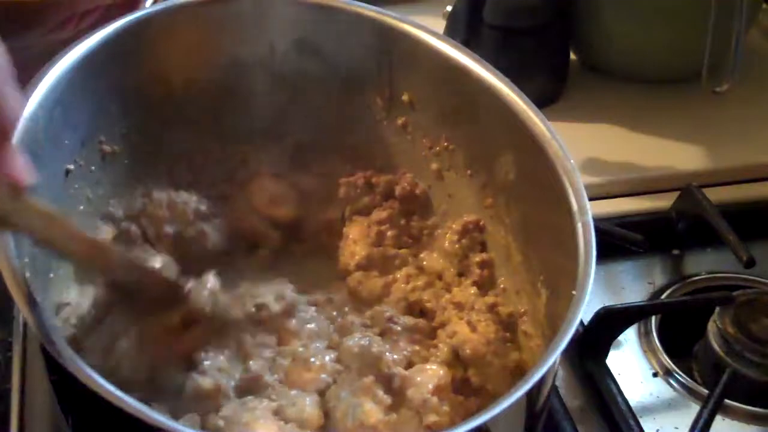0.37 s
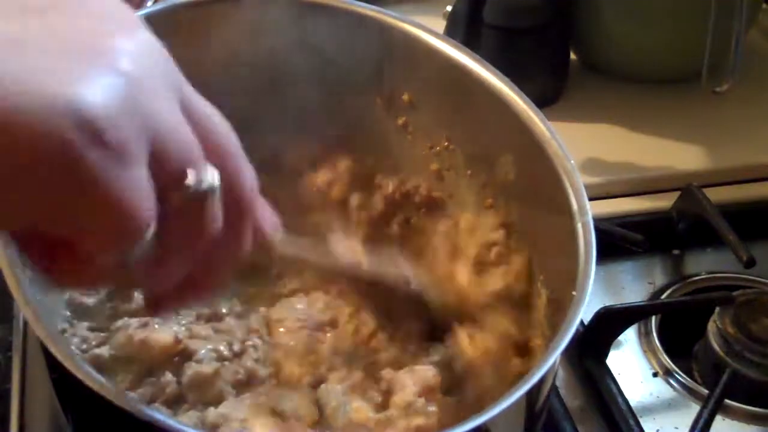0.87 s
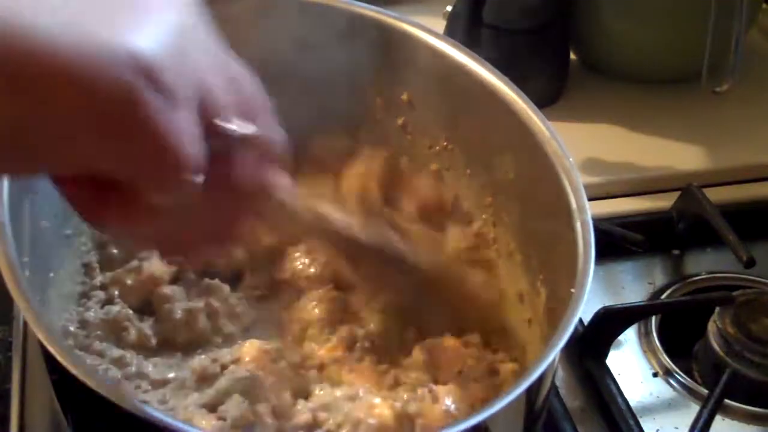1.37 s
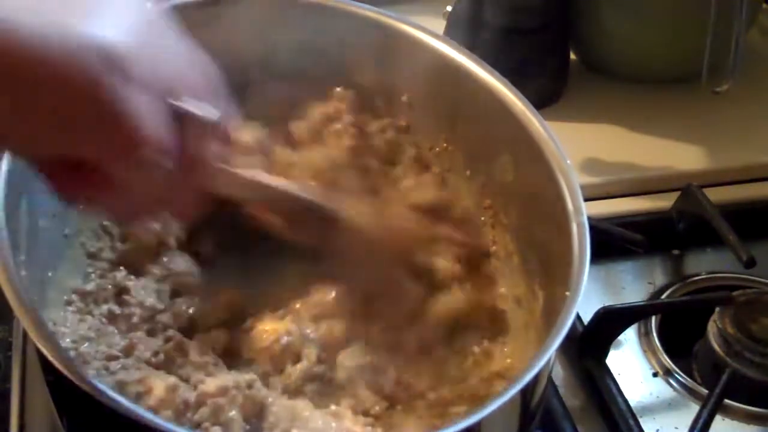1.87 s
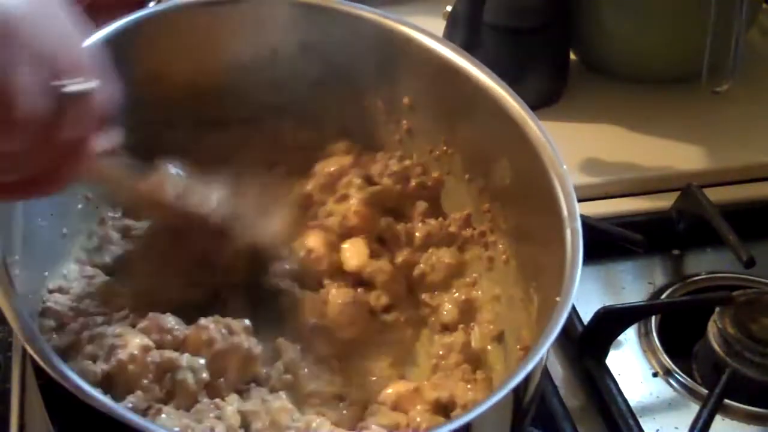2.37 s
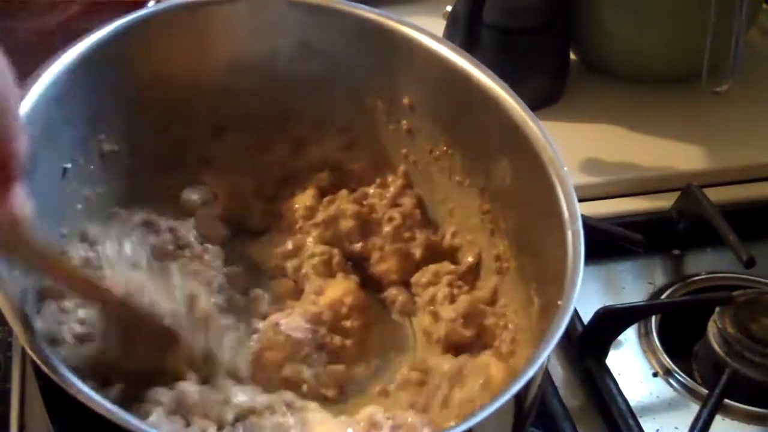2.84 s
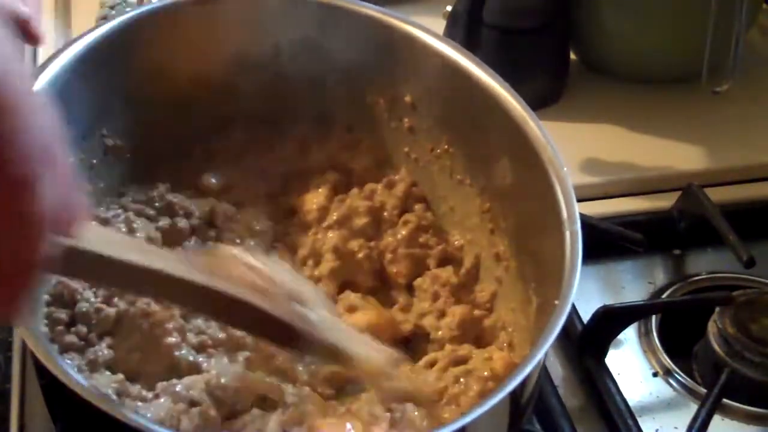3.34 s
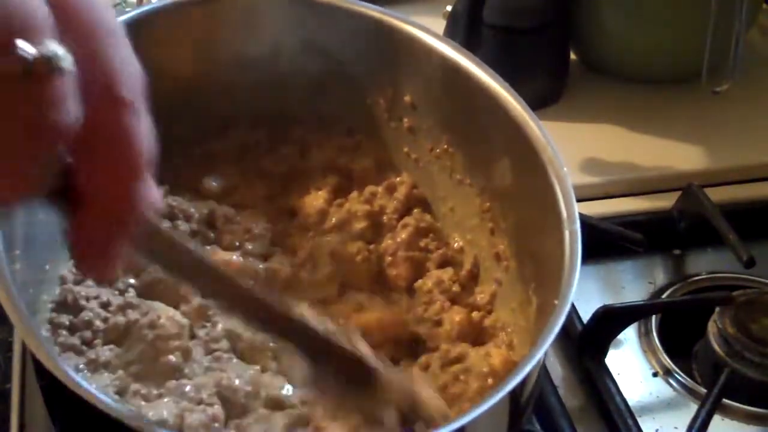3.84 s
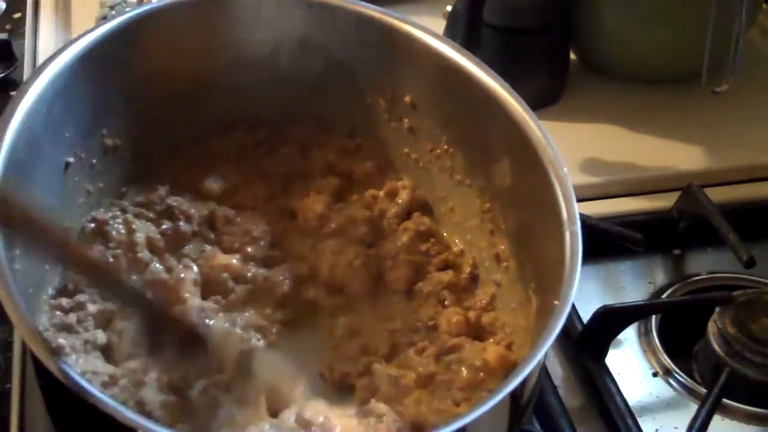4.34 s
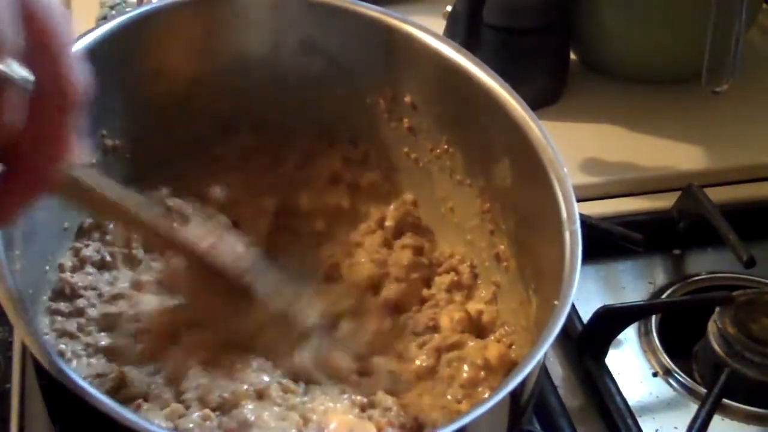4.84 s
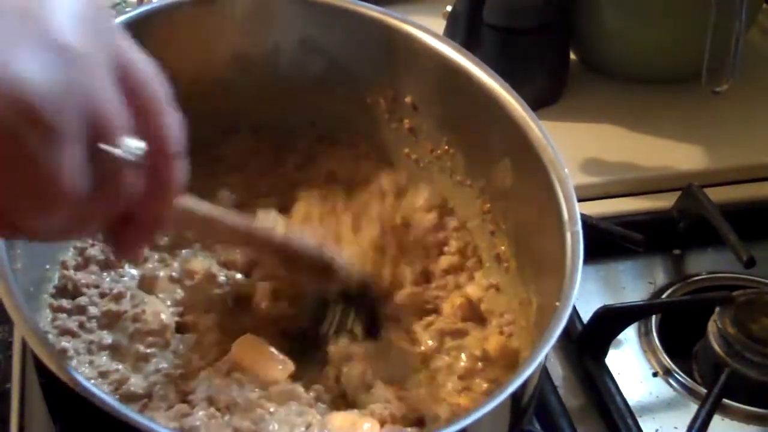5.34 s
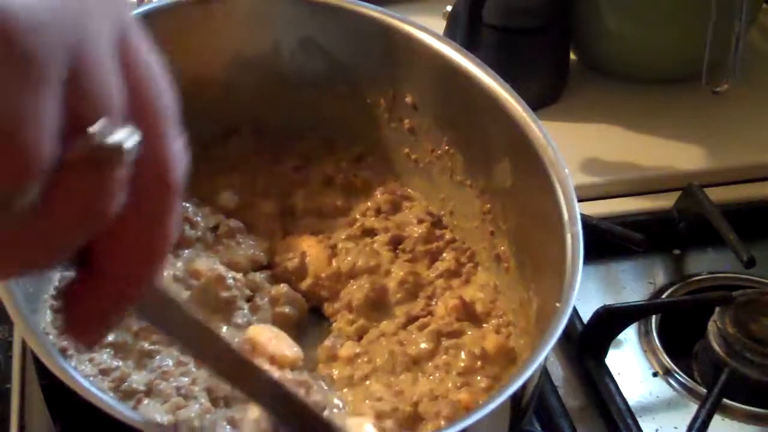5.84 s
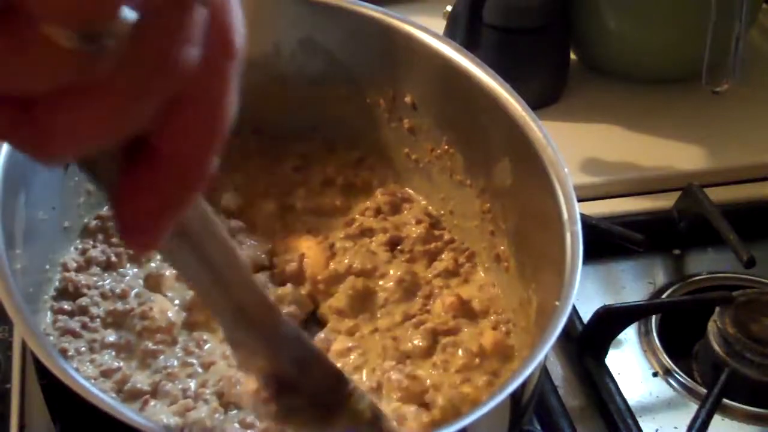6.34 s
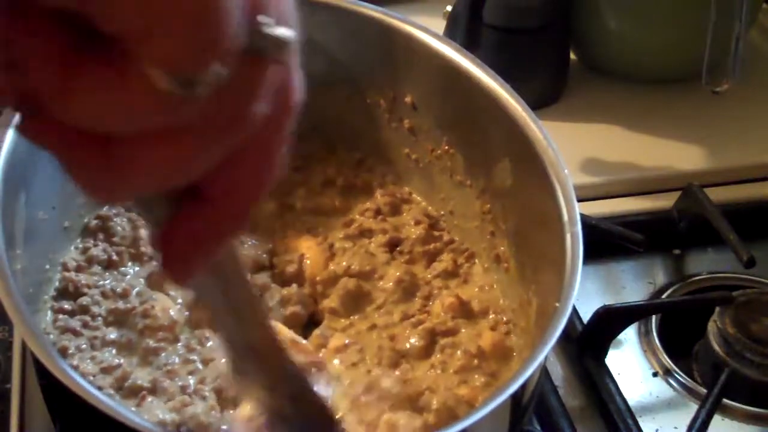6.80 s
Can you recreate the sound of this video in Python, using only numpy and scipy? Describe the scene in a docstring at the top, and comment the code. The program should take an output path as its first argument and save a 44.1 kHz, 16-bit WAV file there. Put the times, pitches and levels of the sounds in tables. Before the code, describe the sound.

A wooden spoon stirs thick sticky paste in a metal pot, with wet squelches, small pops, dull knocks and scraping skids over faint steady hiss.

```python
"""In a kitchen, a wooden spoon stirs a thick, sticky mixture in a metal pot, close to a small camera.
Paste: ringing, spattering bursts, many tiny ones per squelch and louder single pops.
Spoon: wooden ticks, pushes that ring the pot's low modes, chatter that skids over the bare wall,
shaped noise that drags. Under it lies steady filtered noise, a hiss with a few whining bands."""
import sys
import numpy as np
from scipy import signal
from scipy.fft import rfft, irfft, next_fast_len
from scipy.io import wavfile
from scipy.ndimage import uniform_filter1d, map_coordinates

SR = 44100
rng = np.random.default_rng(int(sys.argv[2]) if len(sys.argv) > 2 else 0)


def convert_level_to_amplitude(level_db):
    """Map a level in decibels to its linear amplitude factor."""
    exponent = np.asarray(level_db, float) / 20
    return 10 ** exponent


def log_audio(samples):
    """Write samples as a 16-bit WAV file to the path given in sys.argv[1]."""
    # one column per channel
    frames = np.atleast_2d(samples).T
    # limit to full scale, then quantise
    limited = np.clip(frames, -1, 1)
    pcm = np.round(limited * 32767).astype(np.int16)
    wavfile.write(sys.argv[1], SR, pcm)


N = 317079  # samples

# noise bed spectrum: (frequency [Hz], level [dB])
HISS_SPECTRUM = [(12, -26), (20, -8.5), (53, -17.5), (95, -17), (160, -14.5), (604, -18), (860, -12),
                 (1230, -17), (2060, -16), (2360, -20), (12500, -21.5), (13800, -25)]
# resonances that shape the whining bands: (centre [Hz], width [Hz], level [dB])
WHINE_BANDS = [(859.3, 21, 0.5), (993, 14, -10), (2053, 53, -5), (3030, 60, -11), (4550, 120, -13),
               (5330, 20, -6), (6250, 20, -8.5), (6870, 90, -11.5), (7630, 127, -8.5), (8540, 34, -9.5),
               (9270, 61, -9.5), (12580, 120, -11)]
# strokes of the spoon: (start [s], length [s], drag along the pot [dB], squelch of the paste [dB])
STROKE_EVENTS = [(0, 0.0099, -56.5, -59.5), (0.726, 0.25, -90, -59.5), (1.27, 0.26, -60, -59),
                 (1.436, 0.34, -59.5, -62.5), (1.8, 0.44, -62, -61), (2.325, 0.37, -69, -58),
                 (2.913, 0.24, -64.5, -67), (4.13, 0.16, -69, -69), (4.7, 0.27, -83, -68),
                 (5.297, 0.077, -63, -64), (5.92, 0.058, -72, -73), (6.596, 0.15, -71, -85),
                 (6.808, 0.35, -67, -63)]
# squelch spectrum: (frequency [Hz], level [dB])
SQUELCH_SPECTRUM = [(900, -1.5), (2500, 3), (13500, -2.5)]
# low modes of the loaded pot: (centre [Hz], width [Hz], level [dB])
POT_MODES = [(194, 73, -7.5), (342, 54, 4), (402, 50, -1), (448, 57, -4.5), (670, 80, -4), (986, 13, -1.5),
             (1448, 60, -0.5)]
# spoon's edge skids on bare metal: (time [s], peak before the low cut [dB], t60 [s], tilt [dB/octave])
SKID_EVENTS = [(0.0014, -37, 0.18, -3.5), (0.0586, -41, 0.19, -4.5), (0.811, -35, 0.037, -3),
               (1.253, -28.5, 0.21, -5), (1.4442, -28.5, 0.22, -0.5), (1.4846, -30.5, 0.15, -3),
               (1.704, -34.5, 0.17, -3), (1.722, -38, 0.1, 1), (2.0582, -35, 0.15, 4.5),
               (2.0746, -27.5, 0.096, -5), (2.256, -38, 0.19, -1.5), (2.8401, -25.5, 0.14, 1),
               (2.9853, -25.5, 0.27, -1), (3.0389, -17.5, 0.22, 2), (3.054, -22, 0.18, -1.5),
               (4.694, -44.5, 0.11, -4), (4.955, -41, 0.099, 7), (5.9328, -45, 0.069, -3),
               (6.13, -42, 0.051, -4), (6.334, -42.5, 0.091, -1), (6.632, -44, 0.042, 0.5),
               (6.696, -46, 0.13, 0), (6.8457, -39, 0.1, -4.5), (6.941, -37.5, 0.045, 9),
               (6.9852, -43.5, 0.08, -2)]
# skid spectrum before tilt and wall modes: (frequency [Hz], level [dB])
SKID_SPECTRUM = [(150, -3), (800, 0), (1900, 3), (3000, 5), (6000, 0), (9500, -6), (13500, -12.5)]
# high modes of the pot wall: (centre [Hz], width [Hz], level [dB])
WALL_MODES = [(3020, 27, -5.5), (3275, 16, -1), (4200, 520, -17.5), (4650, 22, -8), (4795, 22, -9),
              (5660, 33, -12), (5980, 57, -5.5), (7300, 19, -6), (8000, 77, -5)]
# room decay: (frequency [Hz], t60 [s])
KITCHEN_DECAY = [(300, 0.18), (3000, 0.14), (12000, 0.082)]
# short pitched pops: pockets bursting in the paste and, among the lowest, ticks of the wooden spoon:
# (time [s], level before the low cut [dB], pitch [Hz])
POP_AND_TICK_EVENTS = [(0.2052, -31.5, 4400), (0.213, -31, 8030), (.214, -35.5, 2020),
                       (0.3438, -33.5, 8200), (.546, -40.5, 780), (0.789, -37, 4300), (0.798, -36, 6100),
                       (0.812, -41, 2170), (0.832, -27, 10300), (0.8759, -29.5, 8000), (0.9152, -31, 3500),
                       (0.92, -32, 6250), (1.07, -29.5, 4650), (1.0776, -24.5, 7850), (1.3148, -29.5, 2430),
                       (1.3291, -29, 3040), (1.3515, -28.5, 8150), (1.6705, -35.5, 6980),
                       (1.7391, -32.5, 3550), (1.808, -35.5, 2720), (1.8543, -31.5, 7340),
                       (1.921, -43, 4240), (2.0753, -32, 2980), (2.3603, -41, 6700), (2.4365, -41, 3500),
                       (2.4435, -21.5, 3520), (2.447, -24.5, 7500), (2.4715, -34, 3440),
                       (2.4771, -24, 6550), (2.4813, -23, 8040), (2.485, -26.5, 1420), (2.493, -28, 1660),
                       (2.495, -27, 2770), (2.56, -35.5, 3180), (2.583, -34, 3200), (2.591, -34, 7060),
                       (2.6629, -27, 11700), (2.704, -34, 12100), (2.7313, -34, 5770), (3.172, -37, 3130),
                       (3.6935, -36.5, 6200), (3.7596, -41, 3370), (3.8133, -38, 4730), (3.93, -39, 4500),
                       (3.9516, -38, 2630), (4.254, -51, 1290), (4.278, -33, 4380), (4.496, -39.5, 3530),
                       (4.7054, -33.5, 9100), (4.721, -42, 1070), (4.7533, -32.5, 4160), (4.861, -39, 3380),
                       (4.982, -34, 4420), (5.1025, -34.5, 8300), (5.2462, -37, 5900), (5.2564, -30, 5080),
                       (5.38, -33, 6400), (5.3947, -42, 3080), (5.964, -46, 5960), (6.6106, -36.5, 9500),
                       (6.921, -33, 3270), (7.0606, -39, 4100), (7.073, -46, 1300), (7.092, -36, 1570),
                       (7.141, -44, 3620)]
# spoon meets pot, levels before the low cut: (time [s], peak [dB], contact [ms],
# damping by the paste [factor on mode widths], rattle [dB])
KNOCK_EVENTS = [(0.72, -50, 0.22, 1.1, -49), (1.2472, -21.5, 0.44, 1, -34), (1.4242, -22, 0.25, 1.7, -42),
                (1.724, -32.5, 0.32, 1.1, -38.5), (1.979, -49, 0.15, 0.69, -47.5),
                (2.324, -28, 0.54, 0.98, -49), (2.341, -36.5, 0.43, 0.8, -45),
                (2.5148, -35, 0.23, 1.4, -43.5), (2.5586, -27.5, 0.32, 3, -43),
                (2.581, -47, 0.41, 0.83, -43.5), (2.975, -40, 0.31, 0.66, -48),
                (4.16, -54, 0.58, 0.48, -53), (4.781, -44.5, 0.91, 0.94, -59), (4.796, -50, .85, 0.18, -54),
                (5.298, -35, 0.56, 3, -49.5), (7.0902, -35, 0.64, 3.4, -46.5),
                (7.0959, -42, 0.77, 3.3, -43.5)]

ATTACK_S, RELEASE_DB_PER_S = 0.0063, 133  # the spoon gets going; the paste settles
REST_DB = -69.5  # the paste squelches faintly on its own
HOLLOW_HZ, SAG_OCTAVES_PER_S = 880, 0.54  # the hollow behind the spoon deepens along a stroke
BLADE_HZ, BLADE_DB = 1350, -7.5  # wooden tick; level against the knock at the middling contact
MIDDLING_CONTACT_MS, BLADE_FADE_POWER = 0.3, 1.5  # longer contacts tick less
RATTLE_T60_S = 0.27
BAND_LIMIT_HZ = 13900


def unit(x):
    """Scale to rms 1."""
    return x / np.sqrt(np.mean(x ** 2) + 1e-20)


def along(points, hz):
    """(Hz, value) points read on a log frequency axis."""
    f, value = np.transpose(points)
    return np.interp(np.log(hz + 1), np.log(f + 1), value)


def filtered(x, response):
    """x times a complex response of frequency."""
    size = next_fast_len(len(x) + 8192)
    spectrum = rfft(x, size) * response(np.fft.rfftfreq(size, 1 / SR))
    return irfft(spectrum, size)[:len(x)]


def modes(table, f):
    """Causal response of a set of resonances, summed with alternating sign."""
    total = 0
    for k, (centre, width, db) in enumerate(table):
        resonance = 1j * f * width / (centre * centre - f * f + 1j * f * width)
        total = total + (-1) ** k * convert_level_to_amplitude(db) * resonance
    return total


def tilt(f, db_per_octave, pivot_hz):
    """A spectral slope about the pivot."""
    return convert_level_to_amplitude(db_per_octave * np.log2((f + 50) / pivot_hz))


def wobble(rate_hz):
    """Smooth random curve, rate_hz knots a second."""
    knots = rng.standard_normal(int(N * rate_hz / SR) + 4)
    return map_coordinates(knots, [np.arange(N) * rate_hz / SR])


def lumps(count, depth_db):
    """Uneven contact: a gain that jumps every 128 samples (2.9 ms)."""
    return convert_level_to_amplitude(depth_db * np.repeat(rng.standard_normal(count // 128 + 1), 128)[:count])


def patches(x, depth_db):
    """Narrow bands swell and fade, each largely on its own."""
    z = signal.stft(x, nperseg=256)[2]
    field = uniform_filter1d(rng.standard_normal(z.shape), size=3, axis=0)  # across bands
    field = uniform_filter1d(field, size=16, axis=1)  # along time
    return signal.istft(z * convert_level_to_amplitude(depth_db * unit(field)), nperseg=256)[1][:N]


def add(track, start_s, sound):
    """Mix a sound in at start_s."""
    part = track[max(round(start_s * SR), 0):][:len(sound)]
    part += sound[:len(part)]


def bursts(start_s, size, hz, cycles):
    """Each burst starts with a brief broad snap, rings a few cycles at its pitch and spatters."""
    t = np.arange(768) / SR
    turns = hz[:, None] * t
    ring = np.sin(2 * np.pi * turns) * (1 - np.exp(-turns / 0.51))
    noise = rng.standard_normal(turns.shape)
    spatter = 0.58 * uniform_filter1d(noise, size=12, axis=1) * np.exp(-t / 0.0045)
    snap = noise * np.exp(-t / 0.00043)
    burst = ring * (np.exp(-turns / cycles) + spatter) + 0.38 * snap
    at = np.round(start_s * SR).astype(int)[:, None] + np.arange(768)
    return np.bincount(at.ravel(), (size[:, None] * burst).ravel(), N + SR)[:N]


def hiss():
    """Steady hiss with narrow bands of noise standing out of it and wavering."""
    bed = unit(filtered(rng.standard_normal(N), lambda f: convert_level_to_amplitude(along(HISS_SPECTRUM, f))))
    bands = filtered(rng.standard_normal(N), lambda f: np.abs(modes(WHINE_BANDS, f)) ** 1.35)
    whine = unit(patches(bands, depth_db=1.8))
    return convert_level_to_amplitude(-61.5) * bed + convert_level_to_amplitude(-64.5) * whine


def stroke():
    """The moving spoon rubs the pot unevenly and tears many tiny pockets in the paste."""
    start_s, length_s, drag_db, squelch_db = np.transpose(STROKE_EVENTS)[:, :, None]
    since_s = np.arange(N) / SR - start_s
    release = convert_level_to_amplitude(-RELEASE_DB_PER_S * np.maximum(since_s - length_s, 0))
    effort = np.clip(1 + since_s / ATTACK_S, 0, 1) * release

    grip = convert_level_to_amplitude(1.5 * wobble(40))
    rub = filtered(rng.standard_normal(N) * grip, lambda f: np.abs(modes(POT_MODES, f)) + 1)
    hz, t, z = signal.stft(rub, SR, nperseg=512)
    into_s = np.where(t >= start_s, t - start_s, np.inf).min(axis=0)  # since the latest start
    octaves = np.log2((hz[:, None] + 20) / HOLLOW_HZ)
    octaves = octaves + SAG_OCTAVES_PER_S * np.minimum(into_s, 0.5)
    hollow = 0.3 / (1 + octaves ** 4) + 1 / (1 + (octaves / 0.25) ** 2)  # broad hump, narrow peak
    drag = unit(signal.istft(z * hollow, SR, nperseg=512)[1][:N])

    when, rank = rng.random((1400, 2)).T
    size = convert_level_to_amplitude(np.minimum(-5 * np.log(rank), 9))  # many faint, a few strong
    pitch_hz = np.clip(6800 * np.exp(0.5 * rng.standard_normal(len(when))), 2000, 13000)
    tiny = bursts(when * N / SR, size, pitch_hz, cycles=1.8)
    wet = unit(tiny) + 0.99 * rng.standard_normal(N)
    squelch = unit(filtered(wet, lambda f: convert_level_to_amplitude(along(SQUELCH_SPECTRUM, f))))

    drag_gain = (convert_level_to_amplitude(drag_db) * effort).sum(axis=0)
    squelch_gain = convert_level_to_amplitude(REST_DB) + (convert_level_to_amplitude(squelch_db) * effort).max(axis=0)
    return drag * drag_gain + squelch * squelch_gain


def skids():
    """A skid is a fast, uneven chatter that excites the wall's high modes."""
    out = np.zeros(N)
    t = np.arange(SR // 2) / SR
    for start_s, peak_db, t60_s, tilt_db in SKID_EVENTS:
        def colour(f):
            wall = 1 + 2.54 * np.abs(modes(WALL_MODES, f))
            return convert_level_to_amplitude(along(SKID_SPECTRUM, f)) * wall * tilt(f, tilt_db, pivot_hz=3500)

        chatter = rng.standard_normal(len(t)) * lumps(len(t), depth_db=1.8)
        shape = (1 - np.exp(-t / (0.0098 * t60_s))) * convert_level_to_amplitude(-60 * t / max(t60_s, 0.02))
        skid = filtered(chatter, colour) * shape
        add(out, start_s, convert_level_to_amplitude(peak_db) * skid / np.abs(skid).max())
    return out


def kitchen(x):
    """Each frequency of the room's answer dies at its own speed."""
    hz, t, z = signal.stft(rng.standard_normal(SR // 2), SR, nperseg=256)
    decay = convert_level_to_amplitude(-60 * t / along(KITCHEN_DECAY, hz)[:, None])
    tail = signal.istft(z * decay, SR, nperseg=256)[1]
    delayed = np.pad(x, (150, 0))  # 3.4 ms
    return signal.fftconvolve(delayed, tail / np.linalg.norm(tail))[:N]


def pops_and_ticks():
    """Single pops and spoon ticks, each at its own pitch."""
    start_s, level_db, pitch_hz = np.transpose(POP_AND_TICK_EVENTS)
    return bursts(start_s, convert_level_to_amplitude(level_db), pitch_hz, cycles=2.36)


def blade_ticks():
    """The wooden blade ticks 2 ms into each knock, louder the briefer the contact."""
    start_s, peak_db, contact_ms = np.transpose(KNOCK_EVENTS)[:3]
    size = convert_level_to_amplitude(peak_db + BLADE_DB) * (MIDDLING_CONTACT_MS / contact_ms) ** BLADE_FADE_POWER
    return bursts(start_s + 0.002, size, np.full(len(start_s), BLADE_HZ), cycles=1.8)


def knocks():
    """A push rings the low modes, higher ones if brief; a rattle follows, duller if soft."""
    out = blade_ticks()
    t = np.arange(SR // 3) / SR
    for start_s, peak_db, contact_ms, damping, rattle_db in KNOCK_EVENTS:
        pot = [(hz, width * max(damping, 0.2), level) for hz, width, level in POT_MODES]

        def rattle_colour(f):
            softness = 1 + (f * contact_ms / 320) ** 2
            return (np.abs(modes(pot, f)) + 0.25) / softness

        swing = 1000 * t / max(contact_ms, 0.05) - 2
        push = swing * np.exp(-swing ** 2)
        tock = filtered(push, lambda f: modes(pot, f) + 0.13)
        chatter = rng.standard_normal(len(t)) * lumps(len(t), depth_db=2.0)
        rattle = unit(filtered(chatter, rattle_colour))
        shape = (1 - np.exp(-t / 0.001)) * convert_level_to_amplitude(-60 * t / RATTLE_T60_S)
        knock = convert_level_to_amplitude(peak_db) * tock / np.abs(tock).max()
        add(out, start_s, knock + convert_level_to_amplitude(rattle_db) * rattle * shape)
    return out


def scene():
    """Pot and paste, their room echo, strokes and hiss; the near sounds carry little bass."""
    struck = pops_and_ticks() + knocks() + skids()
    near = filtered(struck, lambda f: (1j * f / (230 + 1j * f)) ** 4)  # low cut
    return (near + convert_level_to_amplitude(-11.5) * kitchen(near) + stroke() + hiss())[None]


def roll_off(x):
    """The treble ends steeply here."""
    return signal.sosfilt(signal.butter(12, 14600, fs=SR, output="sos"), x)


def record(dry):
    """The camera rolls off steeply at its band limit and adds a small offset."""
    heard = filtered(dry[0], lambda f: 1 / (1 + (f / BAND_LIMIT_HZ) ** 200))
    return roll_off(heard[None] - 0.0004)


dry = scene()
out = record(dry)
log_audio(out)
```